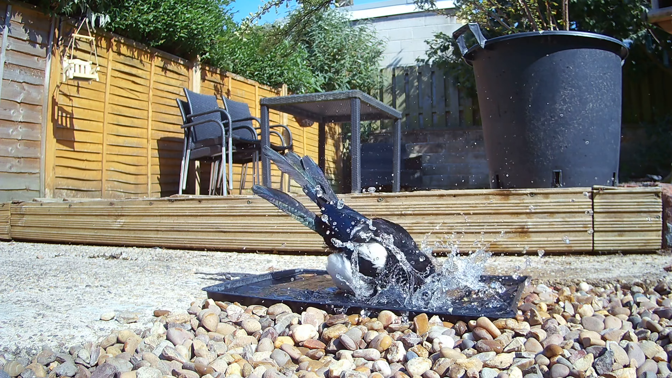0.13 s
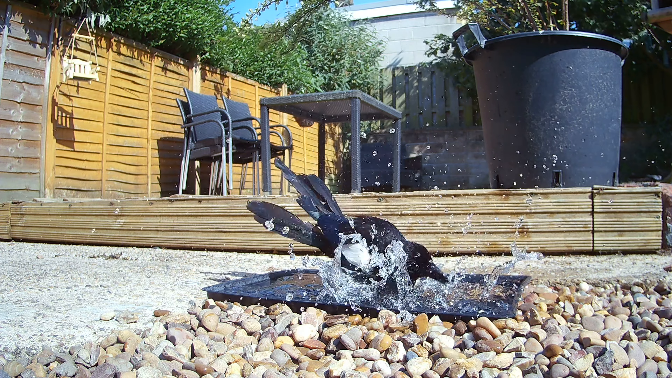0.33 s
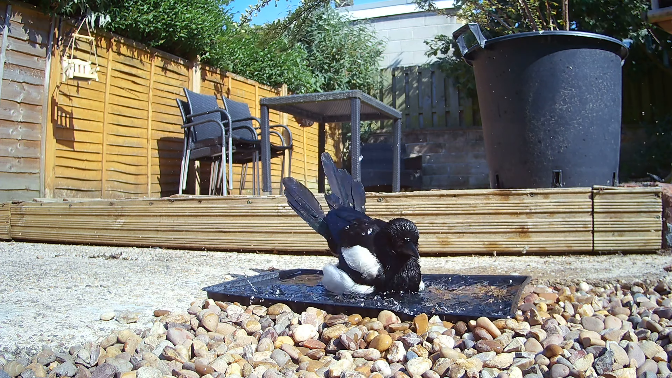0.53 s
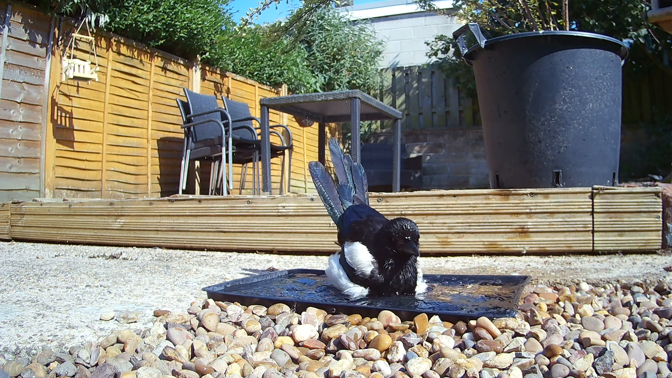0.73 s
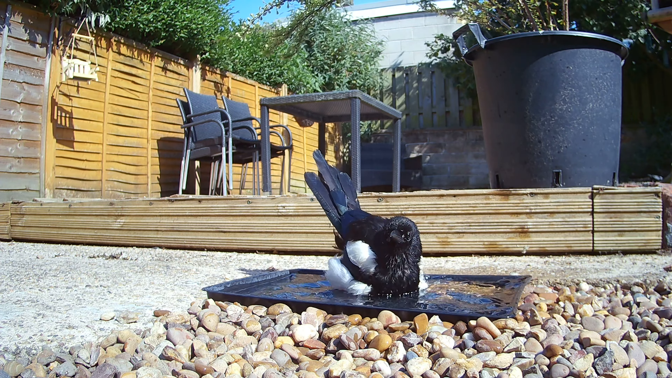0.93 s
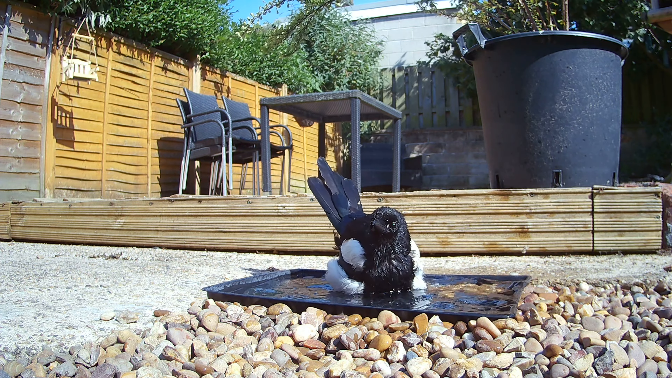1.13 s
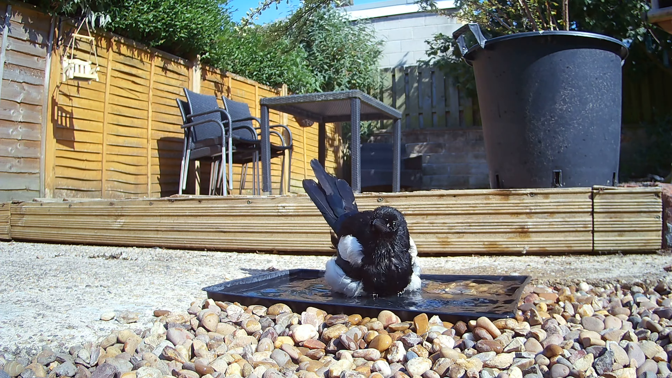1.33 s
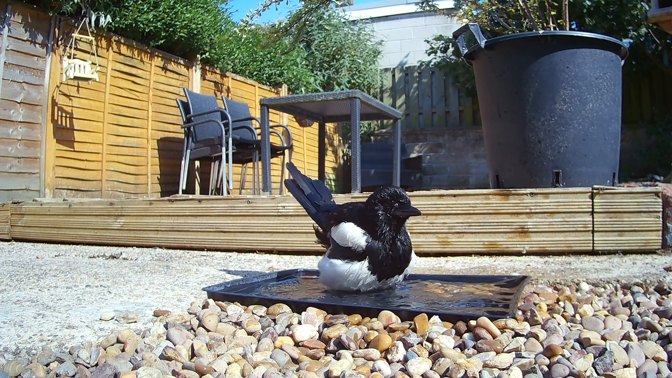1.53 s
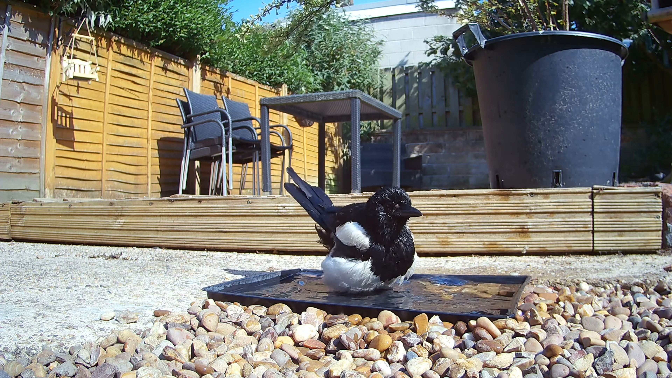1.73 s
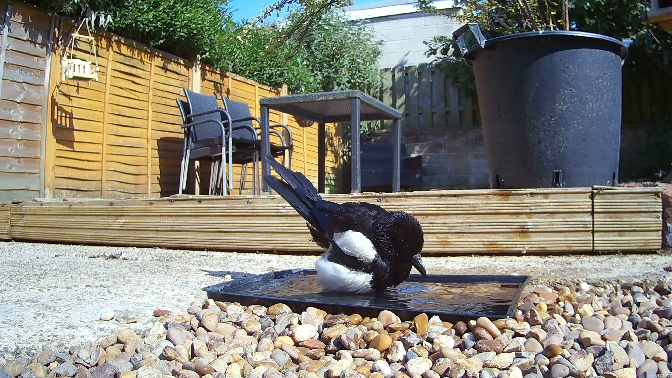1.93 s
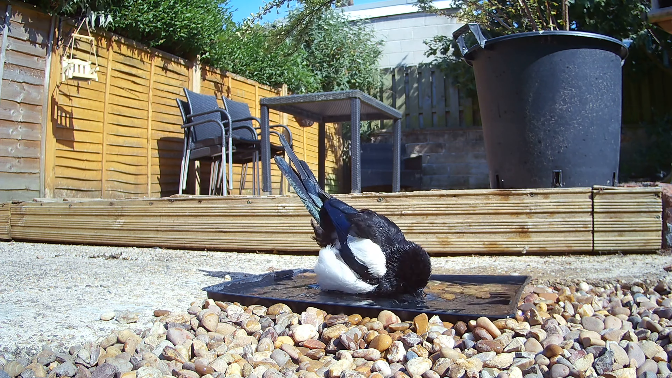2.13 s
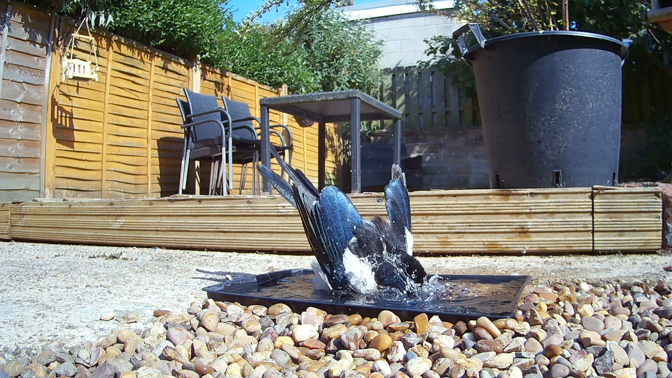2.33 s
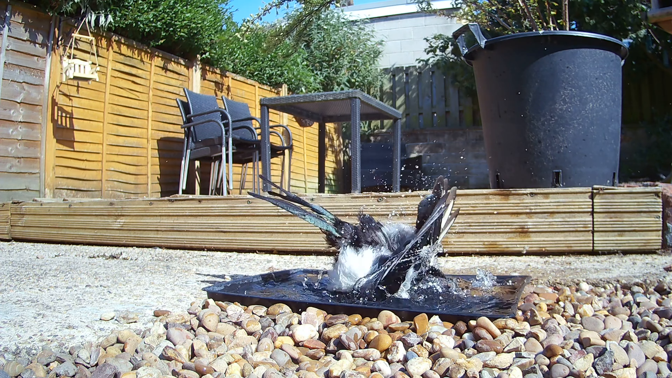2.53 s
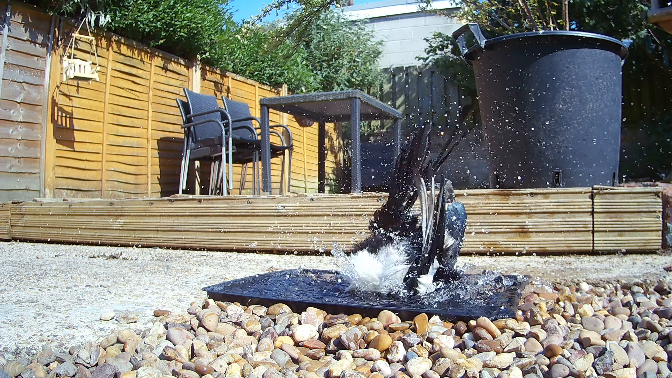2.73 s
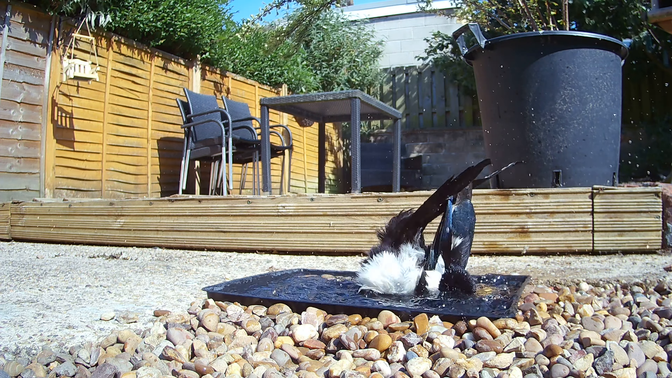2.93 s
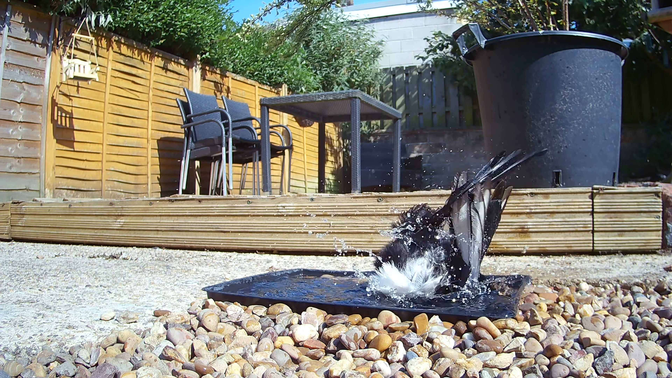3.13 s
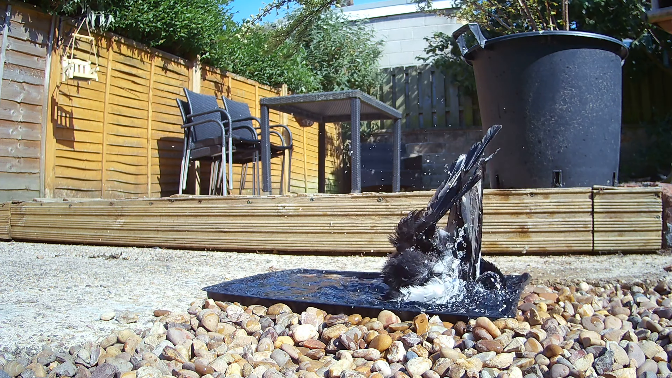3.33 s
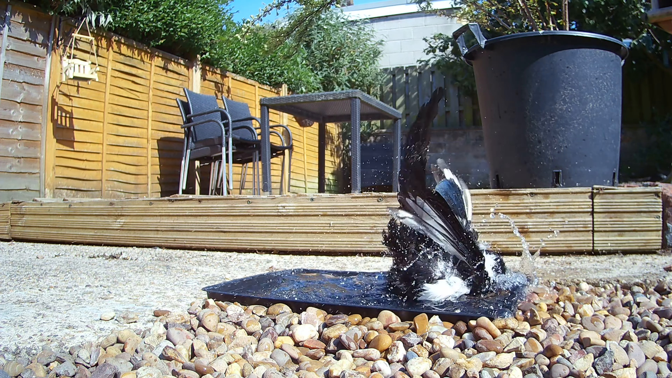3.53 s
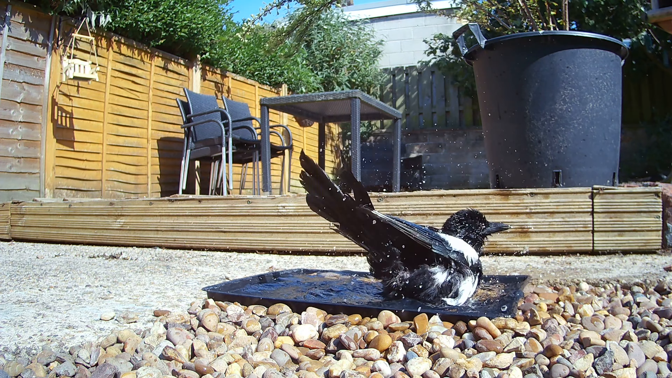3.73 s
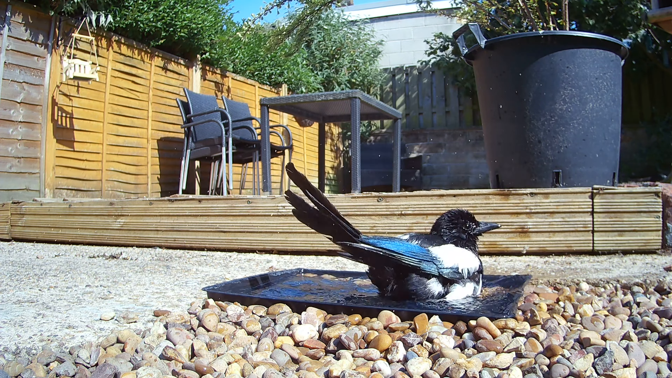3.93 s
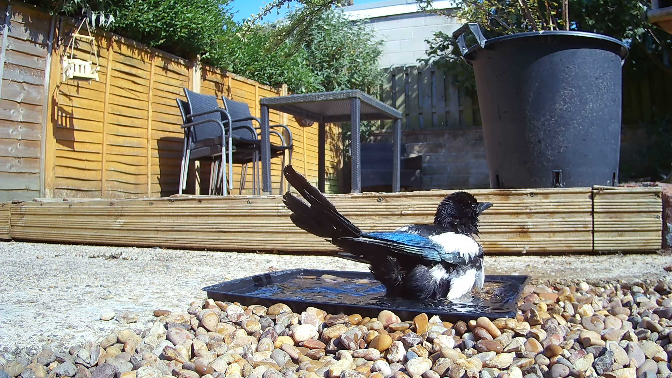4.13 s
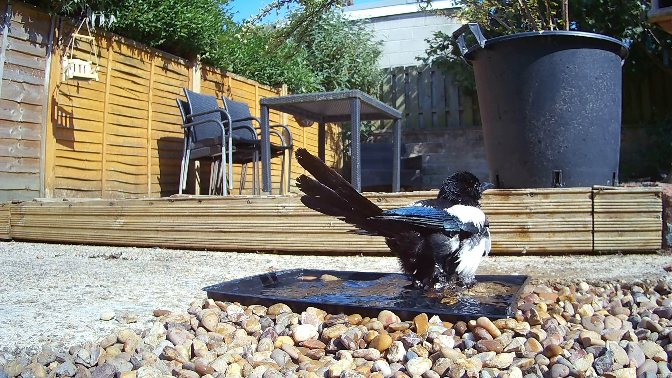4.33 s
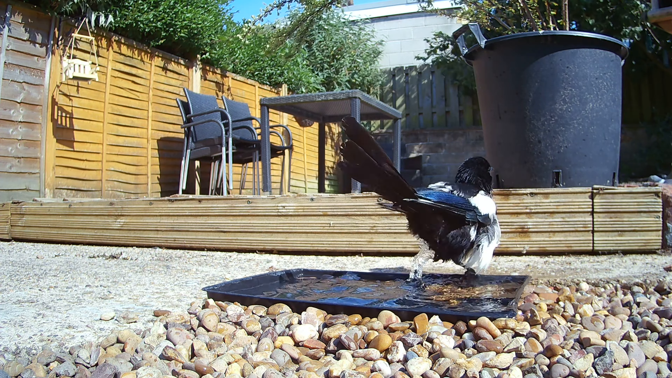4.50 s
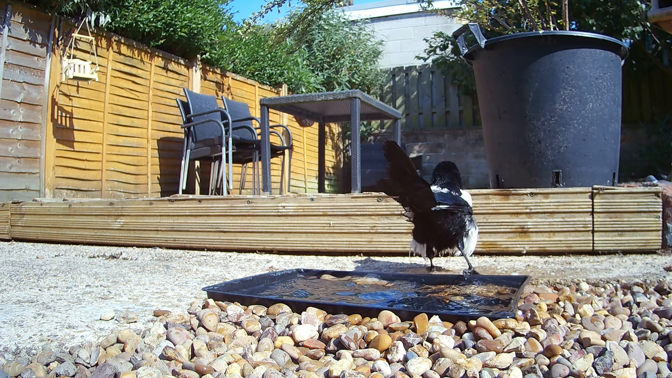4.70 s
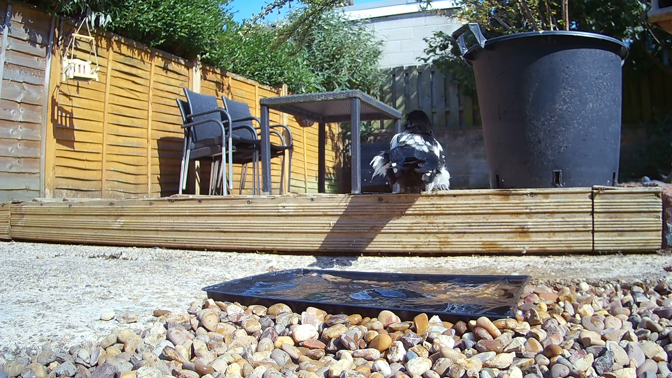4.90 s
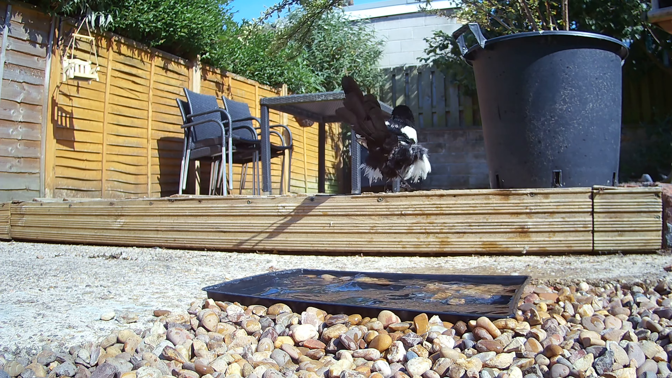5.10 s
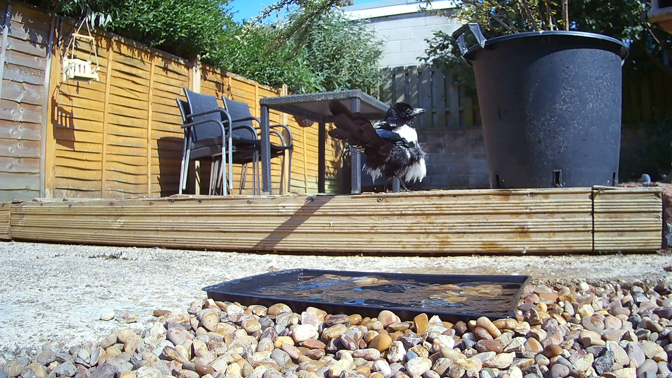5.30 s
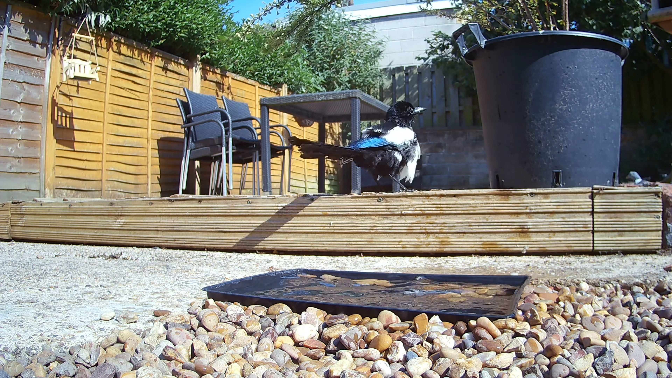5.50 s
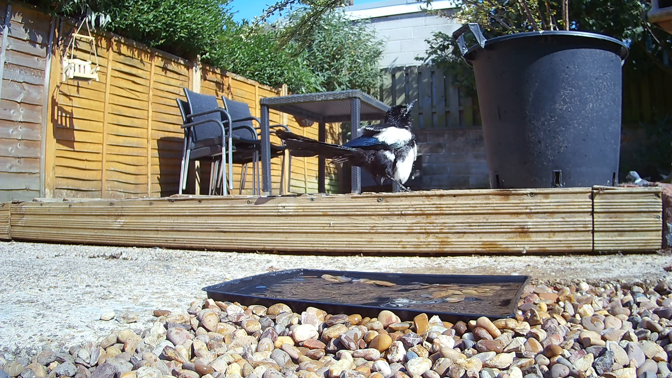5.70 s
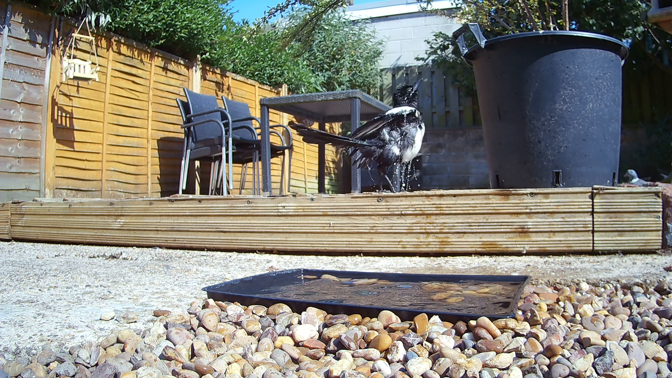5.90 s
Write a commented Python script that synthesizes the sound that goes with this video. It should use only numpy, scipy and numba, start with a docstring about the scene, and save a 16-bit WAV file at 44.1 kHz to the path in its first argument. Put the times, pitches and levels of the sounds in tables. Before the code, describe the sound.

Water slaps hard and rapidly in a shallow plastic tray as a bird bathes, fine spray hissing and air bubbles plopping. It dies into drips and near quiet, with low wind buffets, before irregular splashing resumes at a lower level and stops. Faint wing rustles come at the end. Hoarse little sparrow chirps echo from the fence in an open garden; a far engine hums weakly. Close mono microphone, dry splashes.

```python
"""On a patio a bird bathes in a shallow plastic tray, close to a small camera on the ground.
Wing slaps are swarms of bursting films with plops of trapped air; spray, and faint late rustles of feathers
and wing flaps, are masses of small ringing bubbles with filtered noise. A sparrow beyond the fence chirps in
frequency-modulated whistles with echoes, wind buffets the microphone as low noise and short puffs, a far
engine drones as a wavering sine, and far traffic, rustle and hiss are shaped noise."""
import sys
import numpy as np
from scipy import signal
from scipy.fft import rfft, irfft
from scipy.io import wavfile
from scipy.ndimage import uniform_filter1d
from numba import njit

SR = 44100
rng = np.random.default_rng(int(sys.argv[2]) if len(sys.argv) > 2 else 0)


def file_out(sig):
    """Save sig as 16-bit WAV at sys.argv[1]."""
    # one column per channel
    cols = np.atleast_2d(sig).T
    # limit, then scale
    lim = np.clip(cols, -1, 1)
    pcm = np.round(lim * 32767).astype(np.int16)
    wavfile.write(sys.argv[1], SR, pcm)


def decibels_to_gain(level_db):
    """Convert a level in decibels to a linear amplitude gain (20 dB per decade)."""
    exponent = np.asarray(level_db, float) / 20
    return 10 ** exponent


N = 266981
T = np.arange(N) / SR


def unit(x):
    """Normalization: the signal is scaled to rms 1."""
    return x / np.sqrt(np.mean(x ** 2))


def curve(rows):
    """Linear interpolation: a table's columns per sample, and a gate with 30 ms ramps outside its span."""
    s, *columns = np.transpose(rows)
    gate = np.interp(T, [s[0] - .03, s[0], s[-1], s[-1] + .03], [0, 1, 1, 0])
    return [np.interp(T, s, c) for c in columns] + [gate]


def colour(x, points):
    """Minimum-phase filtering: the folded cepstrum of an (f/Hz, level/dB) response gives a causal filter."""
    hz, db = np.transpose(points)
    grid_hz = np.linspace(1, SR / 2, 513)
    log_gain = np.interp(np.log(grid_hz), np.log(hz), db) * np.log(10) / 20
    cepstrum = irfft(log_gain)
    cepstrum[1:512] *= 2
    cepstrum[513:] = 0
    impulse = irfft(np.exp(rfft(cepstrum)))
    return signal.fftconvolve(x, impulse)[:len(x)]


def band(x, lo_hz, hi_hz, order=2):
    """Band-pass filtering with a maximally flat (Butterworth) response."""
    return signal.sosfilt(signal.butter(order, [lo_hz, hi_hz], "band", fs=SR, output="sos"), x)


def walk(rate):
    """Smoothed random modulation: values held 1 / rate s, averaged twice over that time; spread near 1."""
    k = int(SR / rate)
    held = np.repeat(rng.standard_normal(N // k + 1), k)
    return 1.58 * uniform_filter1d(uniform_filter1d(held, k), k)[:N]


@njit
def bubbles(n, start, step, cycles, size, glide, rise):
    """Damped resonance: each bubble swells, then rings down as its pitch (radians a sample) climbs."""
    out = np.zeros(n)
    for k in range(len(start)):
        phase, length = 0., cycles[k] * 2 * np.pi / step[k]
        for j in range(min(int(4 * length), n - start[k])):
            x = j / length
            phase += step[k] * (1 + glide * x)
            out[start[k] + j] += size[k] * (1 - np.exp(-x / rise)) * np.exp(-1.5 * x) * np.sin(phase)
    return out


def ring(s, hz, cycles, size, glide, rise=0.18):
    """Superposition of damped bubbles: times in s, starting pitches in Hz, lengths in cycles."""
    step = 2 * np.pi * np.clip(hz, 20, .3 * SR) / SR
    start = (np.ravel(s) * SR).astype(np.int64)
    return bubbles(N, start, step.ravel(), np.ravel(cycles + 0 * step), np.ravel(size), glide, rise)


# how hard the water churns, one list for each bout of bathing:
# [t/s, nominal spray level/dB, nominal slosh level/dB]
BATHING_BOUTS = [
    [(0, -40.5, -48), (.2, -37, -48), (.348, -43.5, -47), (.5, -49, -74), (.644, -58.5, -59),
     (.9, -62.5, -63)],
    [(2.17, -69, -74), (2.272, -64, -59.5), (2.482, -49, -86), (2.56, -55, -48.5), (2.652, -51, -49),
     (2.804, -54.5, -58), (2.95, -60, -63), (3.38, -57, -60), (3.42, -45.5, -59), (3.634, -51, -53),
     (3.78, -62, -66), (3.9, -64, -58)],
]
# sheets of water thrown by wing strokes, then (at 4.84 and 5.93 s) faint late rustles of feathers and
# wing flaps: [t/s, nominal level of the spray sound/dB, nominal level of the slosh sound/dB, length/ms]
WING_SURGES = [(0.016, -18, -56, 18), (0.084, -24.5, -44, 14), (0.139, -20, -35, 6.6),
               (0.194, -24.5, -45, 42), (0.253, -21, -41, 24), (.274, -32.5, -56, 65),
               (.317, -33.5, -53, 37), (0.427, -29, -65, 20), (.515, -39, -66, 16), (1.255, -72, -62, 37),
               (1.317, -48, -50, 22), (1.335, -66, -51, 38), (2.32, -39.5, -54, 11.4),
               (2.529, -32.5, -59, 12), (2.555, -47, -50, 75), (2.583, -37, -45, 35),
               (2.693, -37.5, -40.5, 20), (2.745, -44, -51.5, 24), (2.854, -58, -69, 11),
               (3.069, -44.5, -47.5, 36), (3.278, -43, -46, 29), (3.487, -30, -36, 15),
               (3.54, -38.5, -45, 24), (3.748, -55, -49, 21), (4.84, -68, -54.5, 99), (5.12, -58, -64, 76),
               (5.93, -64, -72, 40)]


def churn():
    """Energy addition: the envelopes of wing surges add in power to those of the bathing bouts."""
    high, low = np.zeros(N), np.zeros(N)
    for rows in BATHING_BOUTS:
        db, slosh_db, gate = curve(rows)
        high = np.maximum(high, gate * decibels_to_gain(db))
        low = np.maximum(low, gate * decibels_to_gain(slosh_db))
    for s, db, slosh_db, ms in WING_SURGES:
        x = (T - s) * 1000 / ms
        surge = np.clip(x / 0.18, 0, 1) * np.exp(-1.2 * np.clip(x, 0, 9) ** 2)
        high = np.hypot(high, decibels_to_gain(db) * surge)
        low = np.hypot(low, decibels_to_gain(slosh_db) * surge)
    return high, low


# filter response that colours the spray: [f/Hz, relative level/dB]
SPRAY_RESPONSE = [(300, -41), (650, -7), (1100, -16), (1880, -23), (2750, -8), (4860, -9), (6900, -4.5),
                  (8150, 3), (8800, -42), (9700, -19), (12500, -41), (15400, -52), (16000, -60)]


def spray(count=30000):
    """Random superposition: small bubbles and noise in uneven flurries give spray and late wing rustles."""
    high, low = churn()
    u, v = rng.random((4, count)), rng.random((4, count // 3))
    fizz_hz = 1200 * np.exp(2.3 * u[2])
    fizz_size = decibels_to_gain(-3 * np.log(u[0] + .003))  # few large, many small
    fizz = ring(u[1] * N / SR, fizz_hz, 2.5 + 12 * u[3] ** 3, fizz_size, .04)
    wash = unit(colour(unit(fizz) + decibels_to_gain(-13) * rng.standard_normal(N), SPRAY_RESPONSE))
    # a shared flurry, and one of its own for each pitch band
    flurry = 1.1 * walk(90)
    edges_hz = 300 * 1.6 ** np.arange(9)
    wash = sum(decibels_to_gain(flurry + 1.2 * walk(90)) * band(wash, lo, min(1.6 * lo, 19000)) for lo in edges_hz)
    glug_hz = 400 * np.exp(2.1 * v[2])
    glug_size = decibels_to_gain(-2.5 * np.log(v[0] + .005))
    glugs = ring(v[1] * N / SR, glug_hz, 2.5 + 6 * v[3] ** 3, glug_size, .05)
    slosh = unit(glugs) + decibels_to_gain(-5.5) * unit(band(rng.standard_normal(N), 330, 2000, order=1))
    return high * wash + low * decibels_to_gain(2.0 * walk(50)) * unit(slosh)


def drips(count=600):
    """Random arrivals: small drops fall back at chance moments, louder where the churn is stronger."""
    centre_hz, log_spread = 3690, .4
    over_spray_db, scatter_db = 12.5, 2.5
    s = rng.random(count) * N / SR
    g = rng.standard_normal((2, count))
    hz = centre_hz * np.exp(log_spread * g[1])
    rows = []
    for bout in BATHING_BOUTS:
        at, db, _ = np.transpose(bout)
        wet = (s > at[0]) & (s < at[-1])
        drop_db = np.interp(s, at, db) + over_spray_db + scatter_db * g[0]
        rows += list(np.transpose([s, drop_db, hz])[wet])
    return rows


# low rumble and brighter flutter of wind on the microphone:
# [t/s, nominal rumble level/dB, nominal flutter level/dB]
WIND_GUSTS = [(0, -28, -39), (.08, -37, -36), (.2, -33.5, -49.5), (.27, -36.5, -52), (.42, -33.5, -52),
              (.52, -39.5, -53.5), (.67, -33, -52), (.73, -47, -53), (.8, -40, -57), (.86, -51, -49),
              (.98, -34.5, -48.5), (1.05, -47, -56), (1.18, -35.5, -54), (1.33, -38, -59),
              (1.42, -50.5, -52.5), (3.05, -50.5, -51.5), (3.3, -47, -53.5), (3.57, -44, -51),
              (3.73, -34.5, -49), (3.82, -43, -43), (3.93, -40.5, -50), (4.3, -45, -51), (5.0, -48, -51.5),
              (5.33, -41, -52.5), (5.5, -50, -52.5), (5.75, -40.5, -53.5), (6.05, -46.5, -50.5)]
# sudden puffs: [t/s, peak level/dB, nominal f/Hz that sets how brief the cycle is]
WIND_PUFFS = [(0.044, -21, 83.4), (.052, -21, 198), (0.058, -22.5, 124), (.117, -20, 72.7),
              (.844, -31, 127), (0.887, -26, 74.4), (0.913, -30, 111), (.971, -18.5, 97),
              (3.731, -31, 72.7), (5.071, -29.5, 96.9)]


def wind():
    """Amplitude-modulated band noise for gusts, with one-cycle pressure pulses for puffs."""
    db, flutter_db, _ = curve(WIND_GUSTS)
    rumble = unit(band(rng.standard_normal(N), 22, 60.8))
    flutter = unit(band(rng.standard_normal(N), 85, 215))
    out = decibels_to_gain(db + walk(9)) * rumble + decibels_to_gain(flutter_db + walk(20)) * flutter
    for s, peak_db, hz in WIND_PUFFS:
        x = (T - s - 0.0032) * hz * np.pi  # the pulse crosses zero 3.2 ms after its listed time
        out += decibels_to_gain(peak_db) * np.sqrt(2 * np.e) * x * np.exp(-x * x)
    return out


def traffic():
    """Narrow-band noise: the envelope of the far road's low boom wavers because its band is narrow."""
    centre_hz, width_hz, level_db = 62, 8.1, -53.5
    boom = band(rng.standard_normal(N), centre_hz - width_hz / 2, centre_hz + width_hz / 2)
    return decibels_to_gain(level_db) * unit(boom)


# spectrum of the background: [f/Hz, relative level per Hz/dB]
GARDEN_SPECTRUM = [(59, -19), (100, -9.5), (207, -13.5), (265, -6), (339, -10.5), (488, -12), (900, -14.5),
                   (1400, -26), (2200, -28.5), (3290, -33), (5950, -36.5), (9590, -42), (13000, -43),
                   (15400, -47), (16000, -75)]


def garden():
    """Spectrally shaped noise: far traffic and rustle over microphone hiss, its lower part swelling slowly."""
    x = decibels_to_gain(-53.5) * unit(colour(rng.standard_normal(N), GARDEN_SPECTRUM))
    return x + (decibels_to_gain(0.4 * walk(1.46)) - 1) * band(x, 230, 1000)


# wing slaps and the clearest single drops:
# [t/s, summed strength of the films before filtering as level/dB, crack f/Hz]
WING_SLAPS = [(.0173, -8, 3700), (.0228, -12.5, 3300), (0.033, -12.5, 3100), (0.0551, -21, 4040),
              (0.084, -12.5, 3020), (.123, -44, 5330), (.1373, 0, 5370), (.185, -23.5, 3280),
              (0.1993, -18.5, 2900), (0.2128, -24, 2190), (.255, -8.5, 5970), (0.276, -21, 4300),
              (0.281, -14, 5800), (0.38, -18.5, 8400), (0.3938, -24.5, 2740), (0.428, -38, 2690),
              (.4683, -26.5, 3580), (0.4792, -24, 6750), (0.4974, -29, 4900), (0.516, -22, 4560),
              (0.5917, -35, 4200), (0.6212, -31.5, 3030), (.644, -32, 6030), (.656, -28, 2930),
              (0.7095, -31, 3800), (.741, -29, 3230), (.811, -35, 6860), (.832, -34.5, 2730),
              (1.319, -29, 3960), (1.474, -41.5, 7400), (2.1334, -47, 6100), (2.2098, -34, 4400),
              (2.2394, -30.5, 7760), (2.321, -46, 4000), (2.3874, -35, 6250), (2.3962, -17.5, 3980),
              (2.3962, -16, 6630), (2.4444, -30.5, 6450), (2.493, -35, 3100), (2.535, -13, 6270),
              (2.571, -28, 3830), (2.589, -28, 4020), (2.6308, -19, 4870), (2.6455, -29, 3000),
              (2.662, -37, 3860), (2.7428, -31, 3440), (2.783, -35, 5040), (2.7984, -34, 4500),
              (2.807, -26, 3460), (2.854, -32, 2740), (2.986, -34, 2540), (3.0737, -31.5, 3560),
              (3.1136, -31.5, 2340), (3.244, -30, 7200), (3.2648, -29.5, 4130), (3.4067, -27, 2880),
              (3.4414, -38, 3360), (3.4674, -24.5, 3230), (3.4923, -14.5, 2950), (3.518, -24, 3400),
              (3.6632, -31.5, 2570), (3.788, -31, 3870), (4.3243, -27, 5440), (4.413, -38, 6900),
              (4.4869, -42.5, 3440), (4.493, -39, 8100), (4.64, -42.5, 8120), (4.678, -46, 6920),
              (4.773, -44, 7460), (4.8803, -39, 3400), (5.3734, -36.5, 4100), (5.443, -46.5, 6160),
              (5.8076, -47, 5940)]


def slaps(count=20):
    """Superposed transients: each slap or drop is a tight swarm of bursting films round one pitch."""
    burst_s = .0028  # span of the swarm
    s, db, hz = np.array(WING_SLAPS + drips()).T[:, :, None]
    u, g = rng.random((len(s), count)), rng.standard_normal((len(s), 2 * count))
    stray = np.arange(count) % 2  # every other film is shorter and scattered wider in pitch
    size = decibels_to_gain(-30 * np.abs(u - .3) - 2.7 * stray) * np.sign(g[:, :count])  # the swarm swells, then thins
    size *= decibels_to_gain(db) / np.linalg.norm(size, axis=1, keepdims=True)  # the films share the slap's energy
    pitch = hz * np.exp(0.05 * stray + (0.12 + 0.35 * stray) * g[:, count:])
    crack = ring(s + burst_s * (u - .2), pitch, 4.5 - 3.46 * stray, size, 0.02)
    return band(crack, 850, 9000, order=4)


# plops of trapped air: [t/s, strength before the swell and decay as level/dB, starting f/Hz]
AIR_PLOPS = [(.0173, -16.5, 1040), (0.1374, -15.5, 1260), (0.1986, -32, 1410), (0.2123, -21.5, 1030),
             (0.256, -15, 1300), (0.2758, -32, 1640), (0.2809, -21, 1040), (0.3048, -23, 1040),
             (0.621, -33, 1360), (1.263, -38, 1570), (1.318, -32, 1740), (1.328, -29, 2030),
             (1.341, -31.5, 1500), (2.222, -35, 1540), (2.3956, -44, 830), (2.53, -23.5, 1160),
             (2.589, -26, 1540), (2.6967, -34, 980), (2.743, -38, 1470), (3.114, -34, 1150),
             (3.284, -26, 1110), (3.3987, -29, 1150), (3.4417, -35, 1280), (3.4922, -18, 1250),
             (3.5426, -21, 1090), (3.693, -36, 1220), (3.747, -35, 1220), (3.892, -36.5, 1250),
             (4.3845, -32, 1230)]


def plops():
    """Bubble resonance: trapped air rings for a few cycles as its pitch climbs slightly."""
    s, db, hz = np.transpose(AIR_PLOPS)
    return ring(s, hz, 2.6, decibels_to_gain(db), 0.026, rise=0.41)


def splashes():
    """Reverberation: tray rim, paving and fence return a short decaying tail of slaps and plops."""
    water = slaps() + plops()
    t = np.arange(int(.08 * SR)) / SR
    tail = rng.standard_normal(len(t)) * decibels_to_gain(-60 * t / 0.09)  # 60 dB of decay in 0.09 s
    return water + decibels_to_gain(-9.5) * signal.fftconvolve(water, tail / np.linalg.norm(tail))[:N]


# sparrow chirps: [t/s, base level/dB, pitch factor, second note's added level/dB]
SPARROW_CHIRPS = [(.672, -54.5, 0.96, 3), (0.884, -56, 0.97, 4.5), (1.685, -58.5, 0.97, 4.5),
                  (1.899, -61.5, 0.94, 5), (3.043, -58.5, 0.95, 4), (3.258, -59, 0.94, 3.5),
                  (4.135, -55.5, 0.97, 4.5), (4.828, -59, 1., 7), (5.036, -59, 0.98, 5)]
# first, rising note of a chirp before the pitch factor: [t/s into the chirp, f/Hz, relative level/dB]
RISING_NOTE = [(0, 4090, -11), (.012, 4385, 1), (.03, 4856, -1.5), (.05, 5250, -0.5), (.07, 4900, -14.5),
               (.085, 4180, -39), (.095, 4200, -37)]
# second, falling note of a chirp before the pitch factor: [t/s into the chirp, f/Hz, relative level/dB]
FALLING_NOTE = [(.02, 3262, -18), (.035, 3500, -6), (.06, 3576, -2.5), (.085, 3316, -5), (.11, 3000, -10),
                (.135, 2660, -10), (.147, 2680, -37)]


def sparrow():
    """Frequency modulation: two hoarse, warbled whistles a chirp, smeared by echoes from fences and walls."""
    out = np.zeros(N)
    t = np.arange(int(.15 * SR)) / SR
    for (s, db, pitch, fall_db), flutter in zip(SPARROW_CHIRPS, rng.random(len(SPARROW_CHIRPS))):
        hoarse = unit(uniform_filter1d(rng.standard_normal(len(t)), size=60))  # the pitch trembles
        warble_hz = 200 * np.sin(2 * np.pi * (120 * t + flutter))
        for note, gain in ((RISING_NOTE, 1), (FALLING_NOTE, decibels_to_gain(fall_db))):
            at, hz, note_db = np.transpose(note)
            f = pitch * np.interp(t, at, hz) + warble_hz
            phase = 2 * np.pi * np.cumsum(f + 170 * hoarse) / SR
            envelope = decibels_to_gain(np.interp(t, at, note_db, left=-80, right=-80))
            tone = (np.sin(phase) + decibels_to_gain(-21.5) * np.sin(2 * phase)) * envelope
            out[int(s * SR):int(s * SR) + len(t)] += decibels_to_gain(db) * gain * tone
    t = np.arange(int(.4 * SR)) / SR
    echoes = rng.standard_normal(len(t)) * decibels_to_gain(-60 * t / 0.42)  # 60 dB of decay in 0.42 s
    return out + decibels_to_gain(4.0) * signal.fftconvolve(out, echoes / np.linalg.norm(echoes))[:N]


# a far engine's drone: [t/s, f/Hz, nominal level/dB]
ENGINE_DRONE = [(2.8, 106.5, -74), (2.868, 101.6, -50), (2.936, 99.7, -55.5), (3.26, 102.7, -43),
                (3.576, 97.9, -48.5), (4.116, 99.6, -47), (4.206, 97.3, -56), (4.476, 97, -42.5),
                (4.7, 103.7, -50.5)]


def drone():
    """Phase integration: a sine follows the engine's wavering pitch, and its level comes and goes."""
    hz, db, gate = curve(ENGINE_DRONE)
    return gate * decibels_to_gain(db + walk(6)) * np.sin(2 * np.pi * np.cumsum(hz) / SR)


def scene():
    """Linear superposition: bath, wind, garden, sparrow and engine add at one microphone."""
    return (spray() + wind() + traffic() + garden() + splashes() + sparrow() + drone())[None]


def band_limit(x):
    """A steep low-pass at the top of the band."""
    return signal.sosfilt(signal.butter(12, 15570, fs=SR, output="sos"), x)


def record(dry):
    """Signal chain: the camera takes the single microphone's mix at unchanged gain."""
    return band_limit(dry)


dry = scene()
out = record(dry)
file_out(out)
```